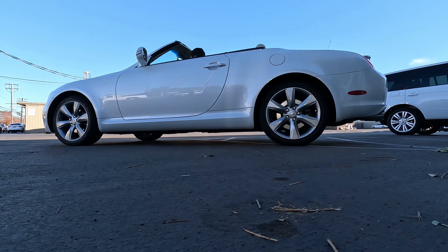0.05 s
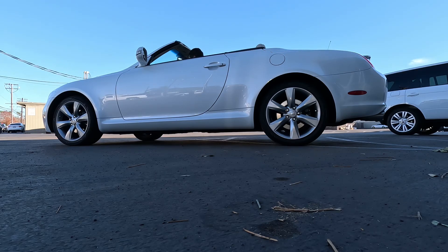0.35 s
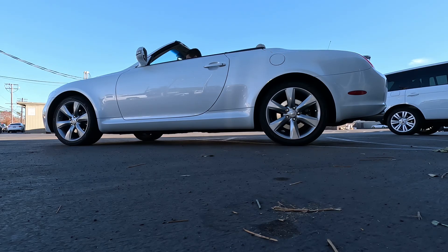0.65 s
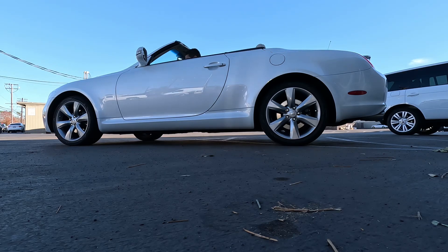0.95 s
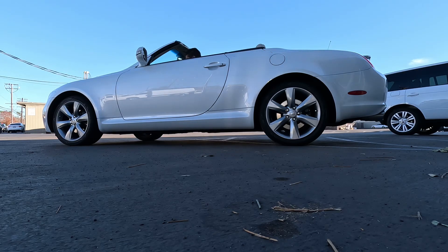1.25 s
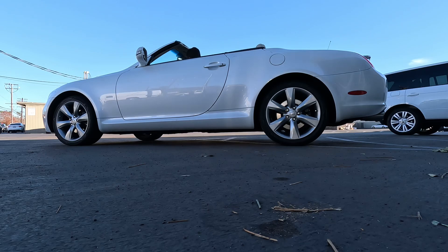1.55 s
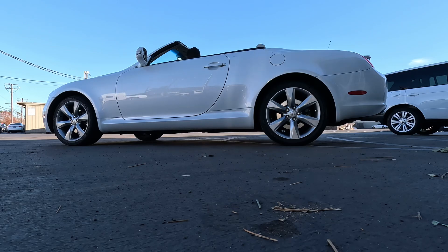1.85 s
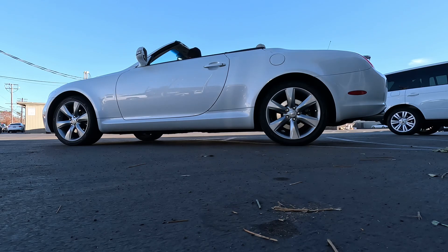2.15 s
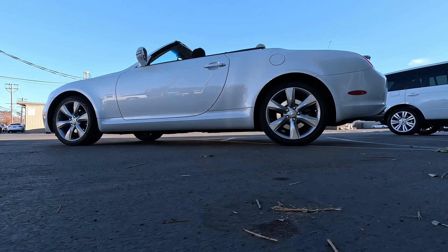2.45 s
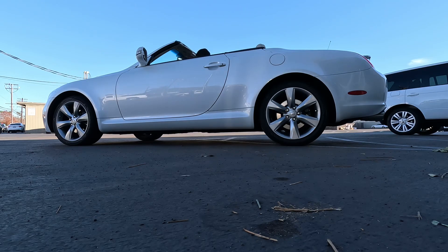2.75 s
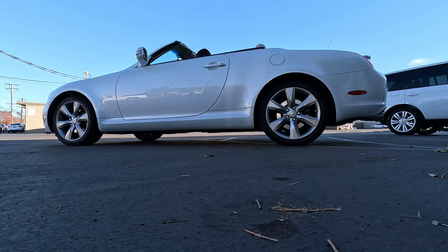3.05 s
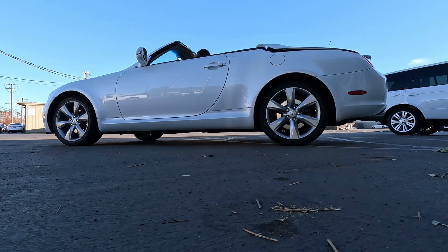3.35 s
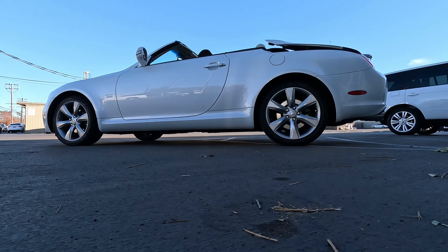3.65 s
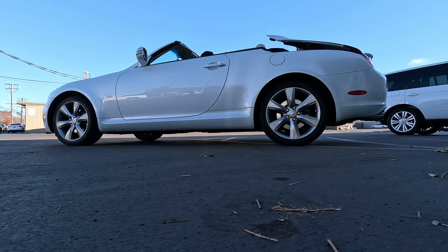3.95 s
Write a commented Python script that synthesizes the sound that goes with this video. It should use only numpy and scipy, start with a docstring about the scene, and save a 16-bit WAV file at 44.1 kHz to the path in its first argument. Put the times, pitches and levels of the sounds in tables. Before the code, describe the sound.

A convertible's engine idles close by in an open car park, throbbing against other idling engines, with fan rush and light ticking. Near the end the idle dips briefly as the power roof's motors whine faintly and its gears whirr.

```python
"""A low, throbbing idle: a convertible's V8 in an open car park, its exhaust note beating against that
of a slower engine close by. Each note is a harmonic series locked to its engine's cycle; a third engine
hums further off. Turbulent gas rumbles, fan and intake rush, valves clatter, belt drive and pumps whine.
Near 3 s the V8 sags briefly as the power roof's small motors start to load it; then the roof gears whirr."""
import sys
import numpy as np
from scipy import signal
from scipy.fft import rfft, irfft
from scipy.io import wavfile
from scipy.ndimage import uniform_filter1d

SR = 44100
rng = np.random.default_rng(int(sys.argv[2]) if len(sys.argv) > 2 else 0)


def transcribe(u):
    """Save the signal u as a 16-bit wav file named by the first command-line argument.

    u: samples, shape (n,) or (channels, n), limited to [-1, 1]; the rate is SR.
    q: integer samples, one column per channel.
    """
    v = np.clip(np.atleast_2d(u).T, -1, 1)
    q = np.round(v * 32767).astype(np.int16)
    wavfile.write(sys.argv[1], SR, q)


N = 176400
t = np.arange(N) / SR


# Firing rate of the V8 and of its neighbour: t/s, f/Hz
V8_RATE = [(0, 60.77), (0.55, 61.6), (1.5, 61.46), (1.9, 60.79), (2.25, 61.15), (2.6, 60.35), (2.85, 57.75),
           (3.05, 57.35), (3.3, 59.03), (3.65, 59.95), (4, 60.2)]
NEIGHBOUR_RATE = [(0, 50.42), (0.5, 50.78), (0.75, 49.68), (1.15, 50.81), (1.75, 50.62), (2.05, 51.4),
                  (2.5, 50.56), (3.0, 50.74), (3.15, 49.98), (3.4, 50.51), (4, 50.41)]

def crank(rate, first_firing_s):
    """Phase is the integral of frequency: a running count of firings, whole at each firing."""
    hz = curve(rate)
    return np.cumsum(hz) / SR + 1 - first_firing_s * hz[0]


def exhaust_note(firings, harmonics, cylinders=8):
    """Fourier series of the engine cycle: firing harmonics peak together; unequal cylinders add the rest."""
    jitter_cycles, wobble_db = 0.0043, 0.8
    cycle = firings / cylinders + jitter_cycles * walk(12)
    note = 0
    for k, db in harmonics:
        offset = rng.random() * (k % cylinders > 0)
        amplitude = undb(db + wobble_db * walk(8.04))
        note = note + amplitude * np.cos(2 * np.pi * (k * cycle + offset))
    return note


# Exhaust line spectra: harmonic of the eight-firing cycle, level/dB (peak, before the effort gain)
V8_HARMONICS = [(2, -36), (4, -49), (7, -35), (8, -21.5), (10, -36.5), (13, -55), (16, -46), (18, -43.5),
                (20, -43), (24, -52.5), (29, -46), (37, -47), (41, -48.5), (48, -48.5)]
NEIGHBOUR_HARMONICS = [(7, -38), (8, -23.5), (11, -57), (13, -47.5), (16, -28.5), (18, -39.5), (19, -50),
                       (20, -37.5), (21, -39.5), (24, -48), (32, -40)]
# Effort gain of each note: t/s, level/dB
V8_GAIN = [(0, -1.5), (1.3, -1), (2.5, -3.5), (3.0, 0), (3.25, -6), (4, -4)]
NEIGHBOUR_GAIN = [(0, -1), (.4, 0), (.8, -2), (1.15, -0.5), (1.6, -2.5), (2.3, 1), (2.7, -1), (3.15, -1),
                  (3.5, 0.5), (4, -1.5)]

def beating_exhausts(v8, neighbour):
    """Beats: two notes close in pitch throb at the difference of their firing rates."""
    v8_note = exhaust_note(v8, V8_HARMONICS) * undb(curve(V8_GAIN))
    neighbour_note = exhaust_note(neighbour, NEIGHBOUR_HARMONICS) * undb(curve(NEIGHBOUR_GAIN))
    return v8_note + neighbour_note


# Spectrum of the exhaust gas noise: f/Hz, relative level/dB
RUMBLE_SPECTRUM = [(12, 0.5), (22, 1.5), (38, 1), (58, 3), (74, 3.5), (90, -2), (130, -14), (170, -6.5),
                   (215, -5), (240, -6.5), (305, -3), (335, -9), (380, -8.5), (450, -19), (700, -29.5)]

def exhaust_rumble(firings):
    """Amplitude modulation: turbulent exhaust gas puffs with each firing."""
    puff_depth, top_hz = 0.28, RUMBLE_SPECTRUM[-1][0]
    puffs = 1 + puff_depth * np.cos(2 * np.pi * firings)
    gas = colour(wide_noise() * puffs, RUMBLE_SPECTRUM)
    return level(signal.sosfilt(butterworth(top_hz), gas), db=-31)


# Spectrum of the engine bay noise: f/Hz, relative level/dB
RUSH_SPECTRUM = [(250, -6), (420, -0.5), (490, 2), (590, -3), (650, -2), (850, -4.5), (950, -1.5),
                 (1150, -3), (1500, -5), (1700, -5), (1790, -11), (2050, -9), (2330, -12.5), (2440, -7),
                 (2600, -13), (2900, -9.5), (3050, -12.5), (3350, -14), (3600, -12), (3800, -16.5),
                 (4050, -18.5), (4600, -20.5), (6700, -20.5), (7600, -25), (8200, -32), (9600, -32),
                 (11300, -38), (13000, -45.5), (14500, -57)]
# Gain of its body, the part below the hiss: t/s, level/dB
RUSH_SWELL = [(0, -1), (.5, -.4), (1.1, 1), (1.16, 3.6), (1.26, 3), (1.35, .2), (1.58, 1.1), (1.8, -.9),
              (2.2, -.7), (2.5, .9), (2.65, -.2), (2.92, -.7), (3.28, .5), (3.6, .5), (3.8, 1.1), (4, .8)]

def bay_rush():
    """Broadband flow noise of fan, belts and intake: the body swells and flickers, the hiss only flickers."""
    noise = colour(wide_noise(), RUSH_SPECTRUM)
    rush = level(signal.sosfilt(butterworth(hz=408, kind="high"), noise), db=-38.5)
    body = signal.sosfiltfilt(butterworth(hz=2200), rush)
    hiss = rush - body
    body_db = curve(RUSH_SWELL) + 0.25 * walk(22)
    hiss_db = 0.62 * walk(22)
    return body * undb(body_db) + hiss * undb(hiss_db)


# Tick strength of the eight cylinders in firing order: relative level/dB
CYLINDER_ACCENTS = [-6, -3, 0, -1, -1, 0, -5, -11]
# Spectrum of the ticks: f/Hz, relative level/dB
TICK_SPECTRUM = [(500, -4.5), (1100, 0.5), (1700, -6), (3000, -2.5), (4200, -14.5), (7000, -17),
                 (9000, -23), (14000, -42)]

def valve_clatter(firings):
    """Impact excitation: valve and injector noise jumps at each firing, then decays exponentially."""
    decay_periods, scatter_db = 1.6, 1.0
    count = firings.astype(int)
    strength_db = np.array(CYLINDER_ACCENTS)[count % 8] + scatter_db * rng.standard_normal(N)[count]
    envelope = undb(strength_db) * np.exp(-(firings % 1) / decay_periods)
    return level(colour(wide_noise() * envelope, TICK_SPECTRUM), db=-47.5)


# Belt drive and pump tones: f/Hz at the idle firing rate, level/dB (rms, before gain and pulsing)
BELT_TONES = [(1148, -57), (2152, -58.5), (2299, -64), (2425, -59), (2712, -62.5), (2900, -56), (3150, -62),
              (3416, -55), (3644, -58), (3920, -68), (4140, -66)]
# Gain of these tones: t/s, level/dB
BELT_GAIN = [(0, 1.5), (.35, 0), (.65, .5), (1.05, -.5), (1.45, 2), (1.7, -.5), (2.3, 1), (2.6, -1),
             (2.8, -4), (3.2, -3.5), (4, -2)]

def belt_whine(firings):
    """Frequency modulation: belt-driven parts warble and pulse as the crank speed sways once a cycle."""
    idle_hz, speed_sway, pulse_db = 61.3, 0.0055, 3
    rad_per_firing = 2 * np.pi / 8
    cycle_rad = rad_per_firing * firings
    shaft = firings + speed_sway / rad_per_firing * np.sin(cycle_rad)
    tones = sum(undb(db) * unsteady_tone(shaft * hz / idle_hz) for hz, db in BELT_TONES)
    return tones * undb(curve(BELT_GAIN) + pulse_db * np.cos(cycle_rad))


# Roof motor tones: start t/s, end t/s, f/Hz, level/dB (rms), pitch flutter/Hz
MOTOR_TONES = [(2.68, 3.5, 1410, -52, 5), (2.87, 3.18, 3415, -54.5, 10), (2.82, 3.22, 3655, -57, 18),
               (3.5, 4.2, 1450, -55, 10), (3.47, 4.2, 2885, -54.5, 30), (3.7, 4.2, 3115, -56, 25)]
ROOF_RAMP_S = 0.052

def roof_motors():
    """Rotational tones: small electric motors whine faintly as the roof cover unlatches and lifts."""
    whine = 0
    for start, end, hz, db, flutter_hz in MOTOR_TONES:
        gate = np.clip(np.minimum(t - start, end - t) / ROOF_RAMP_S, 0, 1)
        whine = whine + undb(db) * unsteady_tone(hz * t, flutter_hz) * gate
    return whine


# Spectrum of the gear whirr: f/Hz, relative level/dB
GEAR_SPECTRUM = [(120, -10), (310, 13), (430, 1), (600, 1), (1200, -4), (2100, -9), (3050, -1), (4000, -16),
                 (6000, -12), (12000, -38)]

def roof_gears(lift_s=3.42):
    """Meshing noise: the gears whirr as they lift the roof cover."""
    whirr = level(colour(wide_noise(), GEAR_SPECTRUM), db=-47)
    return whirr * np.clip((t - lift_s) / ROOF_RAMP_S, 0, 1)


# Line spectrum of the distant exhaust: harmonic of the six-firing cycle, level/dB (peak)
FAR_HARMONICS = [(6, -41.5), (18, -51), (21, -44.5)]

def far_engine(firing_hz=40.12):
    """Periodic firing: a six-cylinder engine hums further off at a constant idle."""
    return exhaust_note(firing_hz * t, FAR_HARMONICS, cylinders=6)


# Fan tones: f/Hz, level/dB (rms)
FAN_LINES = [(1459, -60), (1583, -59)]

def fan_tones():
    """Constant rotation, as of electric fans: faint tones that do not follow the engine speed."""
    return sum(undb(db) * unsteady_tone(hz * t) for hz, db in FAN_LINES)


# Side signal relative to mid: f/Hz, level/dB
SIDE_SPECTRUM = [(60, -68), (125, -45), (250, -22), (420, -15.5), (750, -7.5), (1100, -8.5), (1900, -10),
                 (3000, -11), (4500, -9), (6000, -26), (8500, -11.5), (12000, -14)]

def wide_noise():
    """Partial coherence: two channels of noise, alike in the bass and partly unrelated higher up."""
    mid, side = rng.standard_normal((2, N))
    return mid + colour(side, SIDE_SPECTRUM) * np.array([[1], [-1]])


# Left channel relative to right: f/Hz, level/dB
LEFT_EXCESS = [(250, 0.27), (600, 2.7), (1000, 1.6), (1400, 1), (2400, 1.6), (5500, 0.37), (7500, 2),
               (12000, 1.3)]
# Lag of the left channel: f/Hz, phase/rad
LEFT_LAG = [(200, .02), (600, 0.15), (1200, 0.11), (3000, 0.55), (4200, 0.62), (5300, 0.0032), (8500, 0.15),
            (12000, 0)]

def off_centre(pair):
    """Level and phase differences place a source: slightly louder and later in the left microphone."""
    left = colour(pair[0], [(hz, db / 2) for hz, db in LEFT_EXCESS])
    right = colour(pair[1], [(hz, -db / 2) for hz, db in LEFT_EXCESS])
    lag = np.interp(np.fft.rfftfreq(N, 1 / SR), *np.array(LEFT_LAG).T)
    return np.array([irfft(rfft(left) * np.exp(-1j * lag), N), right])


def unsteady_tone(turns, flutter_hz=5, flicker_db=2.2):
    """Random modulation: a sine of rms 1 whose pitch and level flicker."""
    wander = np.cumsum(flutter_hz * walk(70)) / SR
    amplitude = undb(flicker_db * walk(24))
    return level(amplitude * np.sin(2 * np.pi * (turns + wander)), db=0)


def walk(per_s):
    """Sample and hold: random steps, smoothed twice and scaled to a standard deviation of 1."""
    hold = int(SR / per_s)
    steps = np.repeat(rng.standard_normal(N // hold + 1), hold)
    smooth = uniform_filter1d(uniform_filter1d(steps, hold), hold)[:N]
    return smooth / np.std(smooth)


def colour(x, rows):
    """Spectral shaping by (f/Hz, level/dB) points on a log-frequency axis."""
    hz, db = np.array(rows, float).T
    f = np.maximum(np.fft.rfftfreq(N, 1 / SR), 1)
    gain = undb(np.interp(np.log(f), np.log(hz), db))
    return irfft(rfft(x) * gain, N)


def butterworth(hz, kind="low"):
    """Maximally flat second-order filter."""
    return signal.butter(2, hz, kind, fs=SR, output="sos")


def curve(rows):
    """Linear interpolation of (t/s, value) rows."""
    return np.interp(t, *np.array(rows, float).T)


def level(x, db):
    """Normalisation to an rms level."""
    return x * undb(db) / np.sqrt(np.mean(x ** 2))


def undb(db):
    """Decibels to amplitude ratio."""
    return 10 ** (np.asarray(db) / 20)


def scene():
    """Superposition: three exhausts in the middle, the convertible's machinery a little off centre."""
    v8 = crank(V8_RATE, first_firing_s=0.0107)
    neighbour = crank(NEIGHBOUR_RATE, first_firing_s=0.0143)
    exhausts = beating_exhausts(v8, neighbour) + far_engine() + exhaust_rumble(neighbour)
    engine_bay = bay_rush() + valve_clatter(v8) + belt_whine(v8) + fan_tones()
    return exhausts + off_centre(engine_bay + roof_motors() + roof_gears())


def record(dry, top_hz=14400):
    """Band limiting: a steep low-pass cuts the highest treble."""
    return signal.sosfilt(signal.ellip(8, .2, 70, top_hz, fs=SR, output="sos"), dry)


dry = scene()
out = record(dry)
transcribe(out)
```